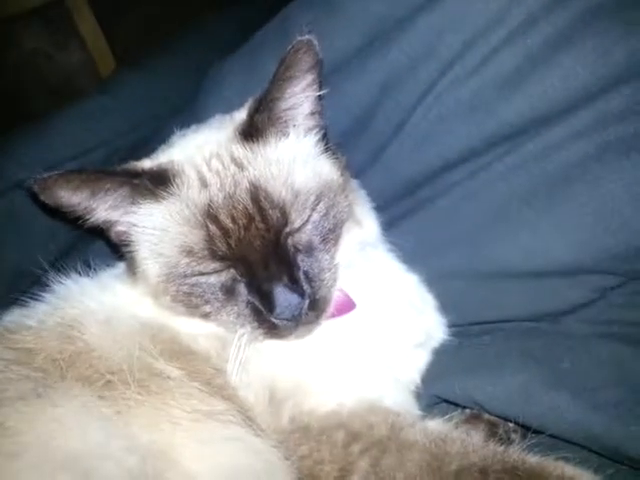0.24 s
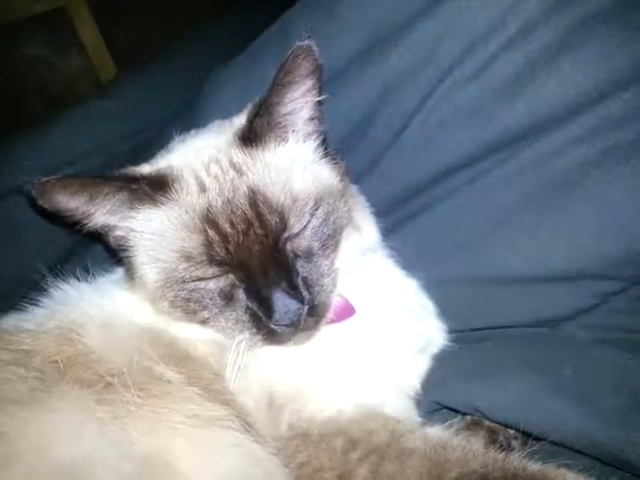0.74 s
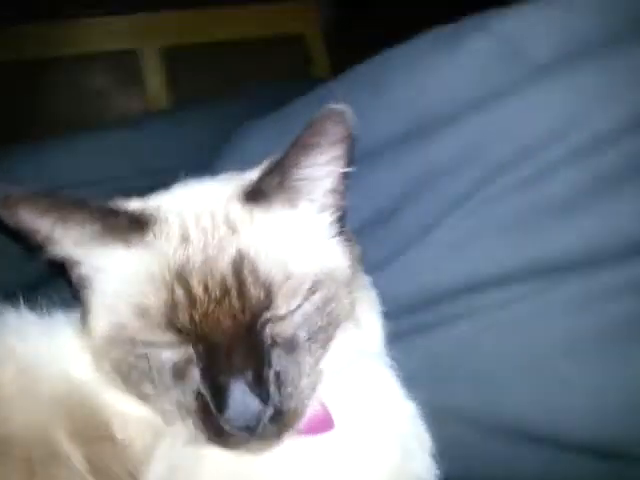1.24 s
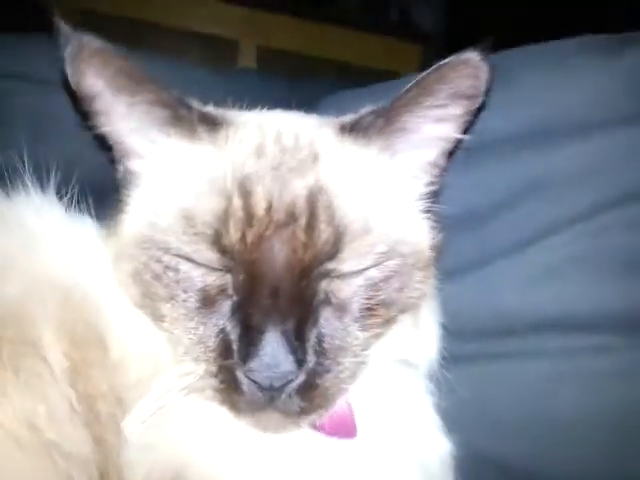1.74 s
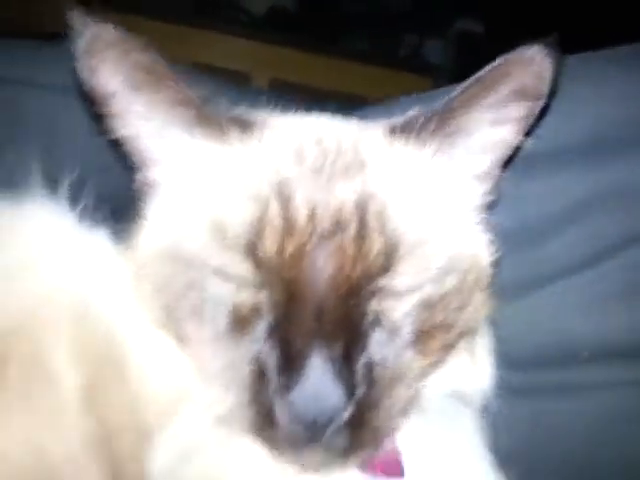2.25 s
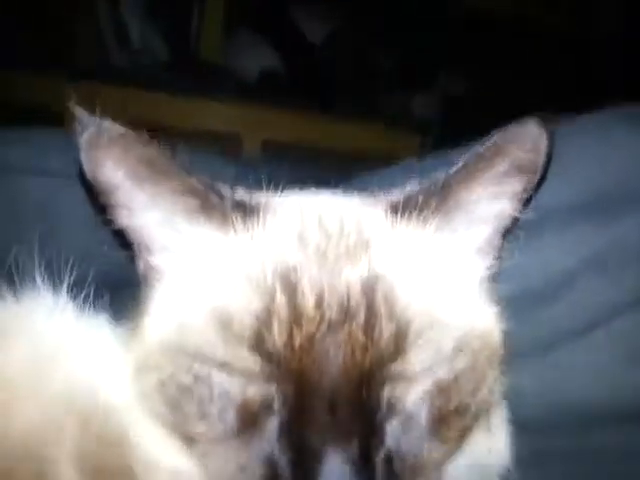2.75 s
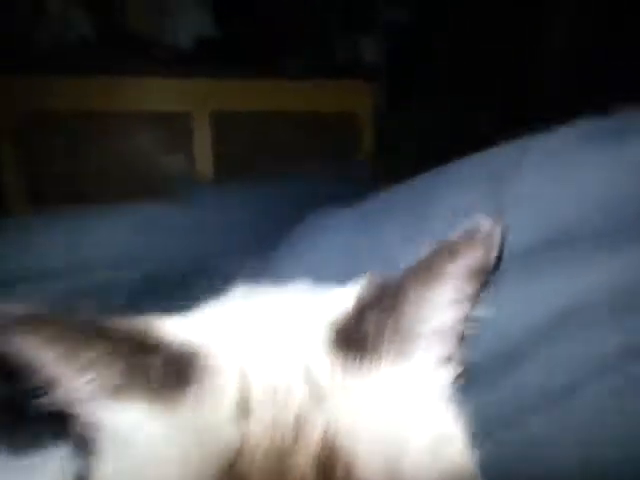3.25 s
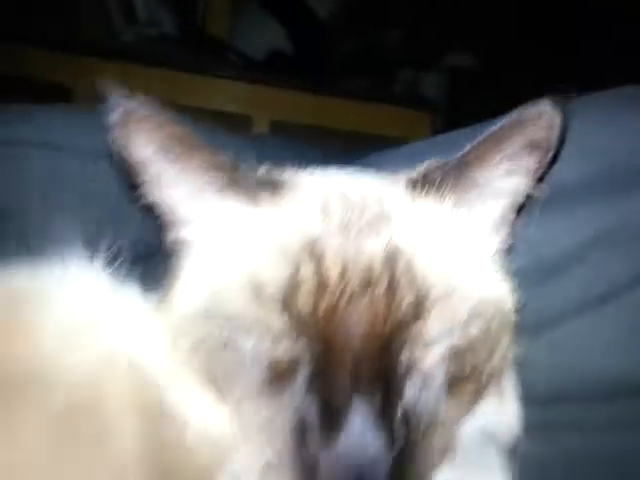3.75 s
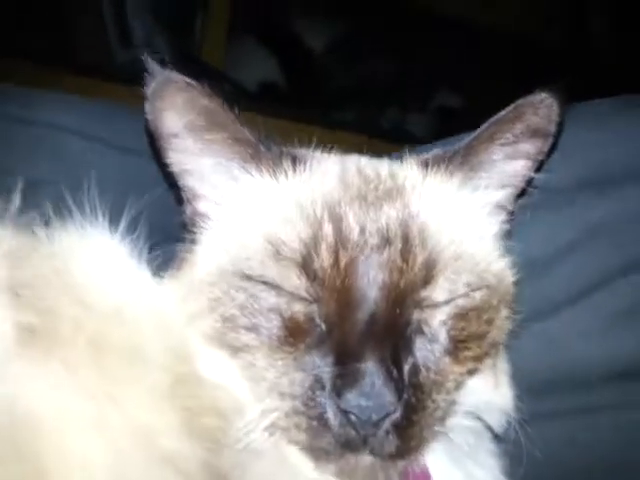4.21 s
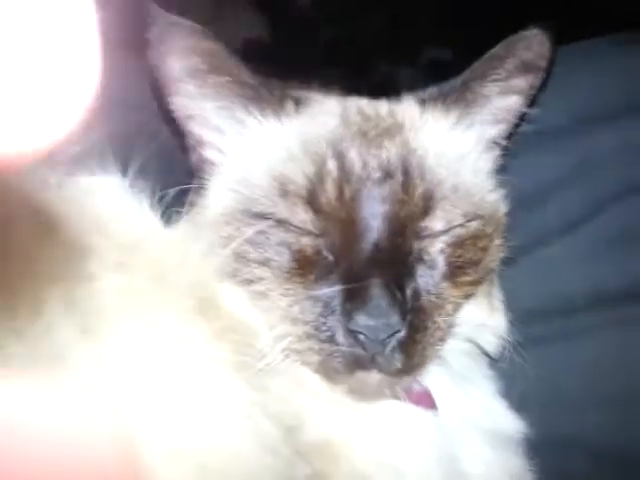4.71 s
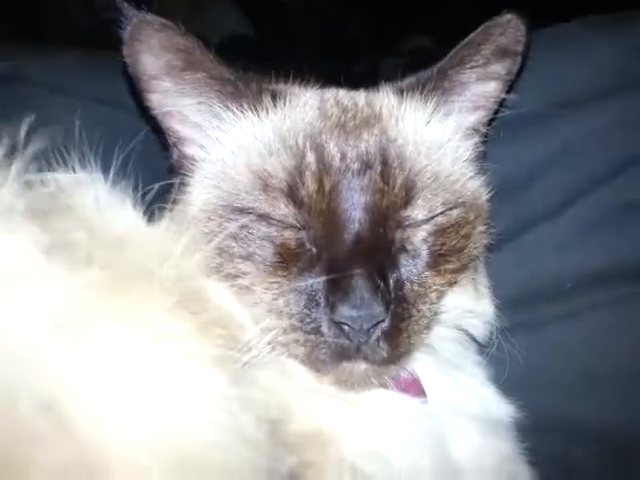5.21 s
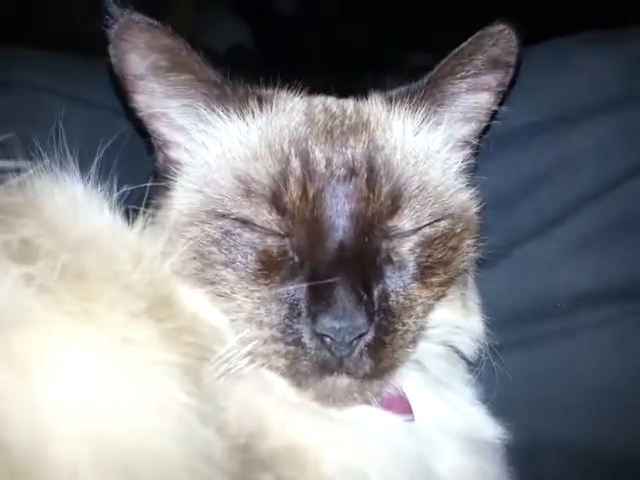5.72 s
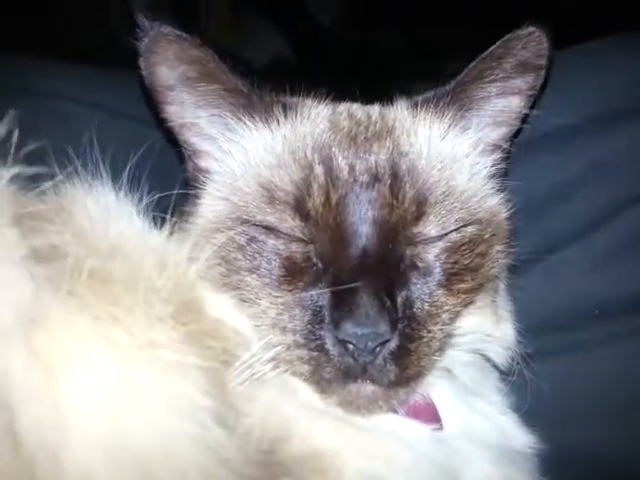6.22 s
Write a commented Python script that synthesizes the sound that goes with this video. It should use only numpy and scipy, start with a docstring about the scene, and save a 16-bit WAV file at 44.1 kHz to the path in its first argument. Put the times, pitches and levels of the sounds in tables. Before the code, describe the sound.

A quiet room with a soft murmur, faint hum and microphone hiss. From the start a cat purrs softly and low, around 24 pulses a second, slightly faster and slower by turns, each a double thump with fluttering breathy air. At 0.6-0.8 s come a few barely audible high squeaks. From 1.2 s the microphone moves close, the purr swells strongly by 1.5 s, and cloth rustles with little ticks. A hard plastic click snaps at 2.95 s, after a lesser one; tiny crackles follow around 3.5 s, as the purr eases slightly, then returns nearer. Clicks and ticks cluster at 3.9-4.4 s, with a very loud snap at 4.65 s. Fingers rub scratchily from 4.4 to 5.4 s, with a sharp bump on the microphone at 5.12 s and weaker ones at 5.54 and 5.85 s amid rustling. A loud click at 6.07 s and small ticks end it over the continuing purr.

```python
"""A cat dozes on a quilt and purrs: some 24 throat pulses a second, a little faster and slower by turns, each a
pair of snaps that rings the chest and sends air fluttering. A hand-held camera moves up to its face: cloth
rustles in grainy swells, fingers rub the plastic case with coloured friction, the case clicks in the grip and
thin ticks sound, all as short bursts of damped sines, with a short echo. A fingertip bumps the microphone, a
few faint squeaks come first, filtered noise makes the quiet room and the microphone hiss, and a faint low tone
sounds throughout."""
import sys
import numpy as np
from scipy import signal
from scipy.fft import rfft, irfft, next_fast_len
from scipy.io import wavfile
from scipy.ndimage import uniform_filter1d, map_coordinates

SR = 44100
rng = np.random.default_rng(int(sys.argv[2]) if len(sys.argv) > 2 else 0)


def generate_wav(sig):
    """Save sig (samples, or channels by samples) to the path in sys.argv[1] as 16-bit PCM at SR."""
    pcm = np.round(np.clip(np.atleast_2d(sig).T, -1, 1) * 32767).astype(np.int16)
    wavfile.write(sys.argv[1], SR, pcm)


N = 285327

# background of the house: [f/Hz, relative level/dB per Hz]
ROOM_SPECTRUM = [(25, -48), (60, -28), (100, -13.5), (145, -2), (180, -3), (235, -5.5), (400, -9.5),
                 (700, -14), (1100, -18.5), (2200, -24.5), (4400, -30.5), (13500, -54)]
# strokes of the purr, each lasting until the next: [start t/s, pulse rate/Hz]
PURR_STROKES = [(.033, 25.09), (.393, 23.25), (1.294, 25.17), (1.97, 24.19), (2.837, 25.45), (3.389, 24.21),
                (4.251, 25.46), (4.803, 23.41), (5.527, 24.89), (6.133, 22.85)]
# ringing of the cat's chest: [f/Hz, relative level/dB, t60/s]
CHEST_MODES = [(110, -7.5, 0.06), (166.5, -5.5, 0.11), (238, -48, 0.052), (284, -14, 0.11),
               (390, -21, 0.033)]
# air that flutters through the throat: [f/Hz, relative level/dB per Hz]
THROAT_SPECTRUM = [(50, -34), (100, -45), (160, -1), (300, -1), (450, -15.5), (700, -10.5), (1500, -15.5),
                   (4000, -27.5)]
# path of the microphone towards the cat: [t/s, distance/m]
CAT_DISTANCE = [(1.15, 1), (1.55, 0.24), (3.3, 0.41), (4.1, 0.25)]
# thin ticks, some chattering on: [t/s, relative level/dB, length/s of the chatter that follows]
THIN_TICKS = [(1.17, -27, 0), (1.241, -15.5, 0), (1.898, -18.5, 0), (1.921, -24, .03), (2.039, -24.5, .04),
              (4.189, -18, 0), (4.261, -23.5, .015), (4.307, -22, 0), (6.075, -14, 0), (6.148, -28, 0),
              (6.207, -28.5, 0)]
# ringing of a tick: [f/Hz, relative level/dB, t60/s]
TICK_MODES = [(2366, -1.5, 0.02), (2730, -5, 0.015), (5320, 0.5, 0.0077), (8500, -3.5, 0.0053),
              (9800, -2.5, 0.0046)]
# swishes of cloth as the arm moves: [middle t/s, length/s, level/dB]
CLOTH_SWISHES = [(1.55, 0.79, -48), (1.286, 0.13, -40.5), (1.67, 0.17, -44), (1.996, 0.4, -51.5),
                 (2.213, 0.12, -46.5), (2.335, 0.13, -42), (2.494, 0.25, -47), (2.783, 0.1, -42.5),
                 (2.898, 0.33, -52), (3.54, 0.3, -52), (3.929, 0.095, -46), (4.247, 0.37, -46),
                 (4.277, .08, -45), (4.427, 0.1, -41), (4.988, 0.067, -36.5), (5.374, 0.37, -37.5),
                 (5.608, 0.13, -37), (5.865, 0.18, -48), (6.136, 0.51, -52)]
# colour of rubbing cloth: [f/Hz, relative level/dB per Hz]
CLOTH_SPECTRUM = [(60, -50), (150, -7), (350, -2.5), (680, -7), (1000, -2.5), (1600, -4), (2400, 2),
                  (3500, -3.5), (5100, -2), (6300, -6), (8000, -5), (11000, -11.5), (14500, -32)]
# clicks of the camera case: [t/s, level/dB, centre f/Hz]
CASE_CLICKS = [(1.333, -32, 1600), (1.342, -24, 5500), (1.8975, -20.5, 1770), (2.427, -29, 915),
               (2.8666, -13, 1400), (2.951, 0, 2450), (3.049, -29, 1500), (3.441, -28, 1700),
               (3.4615, -29.5, 2300), (3.5313, -29.5, 1700), (3.55, -27.5, 2430), (3.569, -27, 1700),
               (3.591, -26, 1700), (3.838, -30.5, 2540), (3.9045, -17, 1240), (3.938, -17, 4500),
               (4.0446, -8.5, 4300), (4.172, -15.5, 2960), (4.24, -21.5, 2380), (4.3584, -25.5, 2000),
               (4.6486, -18, 2390), (4.654, 2, 2730), (4.891, -26.5, 3980), (5.0539, -25.5, 4630),
               (6.074, -5, 2215)]
# ringing of the plastic case: [f/Hz, relative level/dB, t60/s]
CASE_MODES = [(1040, -7, 0.0089), (1760, -4, 0.0099), (1820, -0.5, 0.0032), (2450, 0.5, 0.007),
              (3490, -2, 0.0027), (4300, 0.5, 0.0041), (6100, -10.5, 0.0097), (7130, -1.5, 0.004),
              (10340, -8.5, 0.0057), (12700, -15, .003)]
# finger strokes on the case:
# [start t/s, end t/s, level/dB, resonance under the finger f/Hz, its level/dB against the skin]
FINGER_RUBS = [(1.594, 1.75, -57.5, 850, 8), (2.856, 2.881, -33.5, 1230, -3.5),
               (3.935, 3.958, -42, 4380, -14), (4.394, 4.452, -37, 1290, -9.5),
               (4.573, 4.665, -42.5, 3480, -6.5), (4.727, 4.806, -34, 2720, -9.5),
               (4.813, 4.862, -41.5, 1170, -1), (4.884, 4.924, -46, 4200, -4),
               (4.983, 5.022, -31.5, 1970, -30), (5.036, 5.072, -39, 4030, 3), (5.137, 5.178, -25, 4470, 4),
               (5.174, 5.242, -30, 4500, -7), (5.253, 5.307, -32.5, 3900, -3),
               (5.304, 5.441, -35.5, 390, -4), (5.593, 5.624, -39.5, 2350, -24),
               (5.838, 5.885, -40, 1840, -27)]
# colour of sliding skin: [f/Hz, relative level/dB per Hz]
SKIN_SPECTRUM = [(60, -19), (180, -4), (380, -6.5), (750, -9), (1400, -5), (2300, 0), (3400, -0.5),
                 (5500, -2.5), (8000, -2.5), (10500, -10), (12000, -16.5), (15000, -37)]
# a fingertip bumps the microphone: [t/s, level/dB, level/dB of the thud within the bump]
MIC_BUMPS = [(5.124, 0, 1.5), (5.54, -10.5, 8), (5.845, -22, 5.5)]

PURR_DB = -51.5  # base level of the throat pulses at 1 m, ahead of the gains in purr()
FADE_S, FADE_DB = .27, 4  # each stroke of the purr weakens as it runs out
CHATTER_S, CHATTER_LOSS_DB = 0.01, 2.7  # time between the slips of a chatter, and what each loses
KNOCK_DB, KNOCK_GROWS = -25, 0.3  # knock of the hollow body at a 0 dB click; dB it gains per dB of click
LEAD_IN_S, LEAD_IN_DB = 0.0042, -37  # scrape before the seam gives way: rise time, level against the click
TOP_HZ = 14800  # band limit of the camera


def amp(db):
    """Decibels to gain."""
    return 10 ** (np.asarray(db) / 20)


def unit(x):
    """x at rms 1."""
    return x / np.sqrt(np.mean(x ** 2) + 1e-20)


def wobble(rate):
    """A smooth random curve, rate knots a second."""
    knots = rng.standard_normal(int(N * rate / SR) + 4)
    return map_coordinates(knots, [np.arange(N) * rate / SR])


def filtered(x, response):
    """x times a response of frequency."""
    m = next_fast_len(N + SR // 4)
    spectrum = rfft(x, m) * response(np.fft.rfftfreq(m, 1 / SR))
    return irfft(spectrum, m)[..., :N]


def coloured(x, spectrum):
    """x at rms 1 with the colour of (Hz, dB) points, joined along log frequency."""
    f, db = np.transpose(spectrum)
    return unit(filtered(x, lambda hz: amp(np.interp(np.log(hz + 1), np.log(f), db))))


def low_cut(x, edge_hz):
    """A small body radiates little bass."""
    return signal.sosfilt(signal.butter(2, edge_hz, "high", fs=SR, output="sos"), x)


def friction(rate, spread_db, smooth):
    """Tiny random slips, rate a second, over a smooth hiss."""
    happens = rng.random(N) < rate / SR
    slips = happens * rng.standard_normal(N) * amp(spread_db * rng.standard_normal(N))
    return unit(slips) + smooth * rng.standard_normal(N)


def drifting(x, depth_db):
    """The colour of a sliding contact shifts from moment to moment."""
    z = signal.stft(x, nperseg=256)[2]
    across_bands = uniform_filter1d(rng.standard_normal(z.shape), size=4, axis=0)
    field = uniform_filter1d(across_bands, size=24, axis=1)  # smooth over time as well
    return unit(signal.istft(z * amp(depth_db * unit(field)), nperseg=256)[1][:N])


def ring(modes, t):
    """One damped sine for each mode."""
    return np.array([amp(db - 60 * t / t60) * np.sin(2 * np.pi * hz * t) for hz, db, t60 in modes])


def add(track, s, sound):
    """Mix a sound into the track at time s."""
    part = track[max(0, round(s * SR)):][:len(sound)]
    part += sound[:len(part)]


def room():
    """Steady murmur of the house, a faint low tone whose phase wanders, and microphone hiss."""
    murmur = amp(-54.0) * coloured(rng.standard_normal(N), ROOM_SPECTRUM)
    hum = amp(-63.5) * np.sin(2 * np.pi * 175 * np.arange(N) / SR + .4 * wobble(4))
    hiss = amp(-56.5) * rng.standard_normal(N)
    return murmur + hum + hiss


def purr():
    """Each cycle the vocal folds snap open and shut again more softly; the chest rings and air flutters through."""
    snaps, pushes = np.zeros(N), np.zeros(N)
    ends = [row[0] for row in PURR_STROKES[1:]] + [N / SR]
    for (start, rate), end in zip(PURR_STROKES, ends):
        for s in np.arange(start, end - .5 / rate, 1 / rate):
            # random timing in s, random size in dB
            late, size, shut_late, shut_size = rng.standard_normal(4) * [.0002, .6, .0003, 1]
            distance_db = 20 * np.log10(np.interp(s, *np.transpose(CAT_DISTANCE)))
            fade = FADE_DB * max(0, 1 - (end - s) / FADE_S)
            db = PURR_DB - distance_db - fade + size
            opens = s + late - .003  # the thump peaks 3 ms after its start
            shuts = opens + .0135 + shut_late
            add(snaps, opens, amp([db]))
            add(snaps, shuts, -amp([db - 13.0 + shut_size]))
            add(pushes, opens + 0.0031, amp([.5 * db - 21.5]))  # the ringing varies less than the snaps
    t = np.arange(SR // 8) / SR
    u = (np.pi * 235 * (t - .003)) ** 2
    thump = -amp(-0.5) * (1 - 2 * u) * np.exp(-u)  # one short swing of pressure

    def play(pulses, shape):
        """Start the shape at every pulse."""
        return signal.fftconvolve(pulses, shape)[:N]

    chest = amp(-2.5) * play(pushes, ring(CHEST_MODES, t).sum(0))
    puff = amp(-60 * t / 0.17) * (1 - np.exp(-t / 0.00045))  # quick rise, slower fall
    air = amp(-10.5) * play(pushes, puff) * coloured(rng.standard_normal(N), THROAT_SPECTRUM)
    return low_cut(play(snaps, thump) + chest, edge_hz=74) + air


def squeaks(count=8):
    """A few very faint, high squeaks before the rustling: short sines whose jittery phase makes them grainy."""
    track, t = np.zeros(N), np.arange(SR // 90) / SR
    for s, (pitch, size) in zip(np.linspace(.57, .79, count), rng.standard_normal((count, 2))):
        jitter = np.cumsum(0.19 * rng.standard_normal(len(t)))
        phase = 2 * np.pi * (5450 + 140 * pitch) * t + jitter
        squeak = np.hanning(len(t)) * np.sin(phase)
        add(track, s + 0.0068 * size, amp(-55.0 + 2.2 * size) * squeak)  # louder ones come later
    return track


def ticks():
    """Thin, bright ticks ring, each a little differently; some chatter on and fade."""
    track, t = np.zeros(N), np.arange(SR // 20) / SR
    for s, db, length in THIN_TICKS:
        for k in range(1 + int(length / CHATTER_S)):
            share = amp(2.5 * rng.standard_normal(len(TICK_MODES)))
            tone = share @ ring(TICK_MODES, t * (1 + .03 * rng.standard_normal()))
            grit = amp(-37 - 60 * t / 0.0035) * rng.standard_normal(len(t))
            add(track, s + k * CHATTER_S, amp(db - 9.5 - k * CHATTER_LOSS_DB) * (tone + grit))
    return low_cut(track, edge_hz=860)


def rustle():
    """Cloth fibres catch and slide along the camera; each move of the arm is one bell-shaped swell."""
    t = np.arange(N) / SR
    power = sum(amp(db) ** 2 * np.exp(-2 * (2 * (t - s) / length) ** 2) for s, length, db in CLOTH_SWISHES)
    grain = friction(rate=1200, spread_db=2.5, smooth=1.6)
    fibres = drifting(coloured(grain, CLOTH_SPECTRUM), depth_db=1.5)
    flicker = amp(1.7 * wobble(60))
    return np.sqrt(power) * flicker * fibres


def clicks():
    """The case gives way in tiny snaps: each rings the modes near its own centre and knocks the hollow body."""
    track, t = np.zeros(N), np.arange(SR // 20) / SR
    mode_hz = np.array([row[0] for row in CASE_MODES])
    sign = (-1) ** np.arange(len(CASE_MODES))  # neighbouring modes swing in opposite directions
    for s, db, centre_hz in CASE_CLICKS:
        scatter_db = 1.5 * rng.standard_normal(len(CASE_MODES))
        share = sign * amp(-2.1 * np.log2(mode_hz / centre_hz) ** 2 + scatter_db)
        snap = share @ ring(CASE_MODES, t * (1 + 0.063 * rng.standard_normal()))  # the grip detunes the case
        snap /= np.abs(snap).max()
        crack = amp(-16.5 - 60 * t / 0.0075) * rng.standard_normal(len(t))
        knock = amp(KNOCK_DB + KNOCK_GROWS * db - 60 * t / 0.013) * np.cos(2 * np.pi * 450 * t)
        add(track, s + .0005, amp(db) * low_cut(snap + crack, edge_hz=720) + knock)
        scrape = low_cut(rng.standard_normal(len(t)), edge_hz=1200) * np.exp(-t / LEAD_IN_S)
        add(track, s - t[-1], amp(db + LEAD_IN_DB) * scrape[::-1])  # reversed, it swells into the click
    return low_cut(track, edge_hz=220)


def rubs():
    """Skin drags over the case; in each stroke the gap under the finger picks out one band, rumble to squeak."""
    t = np.arange(N) / SR
    slide = friction(rate=6000, spread_db=-1.0, smooth=1.0)
    skin = drifting(coloured(slide, SKIN_SPECTRUM), depth_db=2.0)
    drag = friction(rate=5000, spread_db=2.0, smooth=0.85)
    track = np.zeros(N)
    for start, end, db, gap_hz, gap_db in FINGER_RUBS:
        edge = 0.32 * (end - start) + 0.0018  # pressure builds and eases over part of the stroke
        pressure = np.clip(np.minimum(t - start, end - t) / edge + .5, 0, 1)
        band = signal.iirpeak(gap_hz, 1.18 + gap_hz / 3000, fs=SR)  # high squeaks have a higher Q than rumbles
        resonance = unit(signal.lfilter(*band, signal.lfilter(*band, drag)))
        track += amp(db) * pressure * (skin + amp(gap_db) * resonance)
    flicker = amp(1.6 * wobble(110))
    return low_cut(track * flicker, edge_hz=105)


def bumps():
    """Skin meets the microphone port: a sharp spike, then one low swing of the trapped air."""
    track, t = np.zeros(N), np.arange(SR // 20) / SR
    for s, db, thud_db in MIC_BUMPS:
        spike_and_thud = [(3280, 6, 0.00047), (340, thud_db, 0.0031)]  # f/Hz, level/dB, t60/s
        add(track, s, amp(db) * ring(spike_and_thud, t).sum(0))
    return low_cut(track, edge_hz=287)


def answer(x, t60):
    """The short, soft echo of a bedroom, as decaying noise."""
    t = np.arange(SR // 3) / SR
    tail = rng.standard_normal(len(t)) * amp(-60 * t / t60)
    return signal.fftconvolve(x, tail / np.linalg.norm(tail))[:N]


def scene():
    """One microphone feeds both channels."""
    case = ticks() + clicks() + bumps()
    echo = amp(-21.5) * answer(case, t60=0.13)
    mono = room() + purr() + squeaks() + rustle() + rubs() + case + echo
    return np.array([mono, mono])


def record(dry):
    """Peaks beyond full scale are clipped; the camera keeps nothing above its band limit."""
    return filtered(np.clip(dry, -1, 1), lambda hz: hz < TOP_HZ)


dry = scene()
out = record(dry)
generate_wav(out)
```